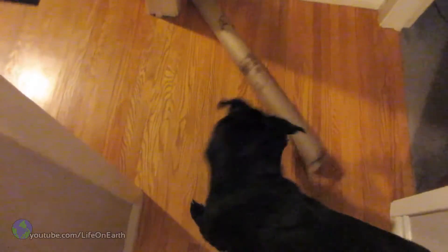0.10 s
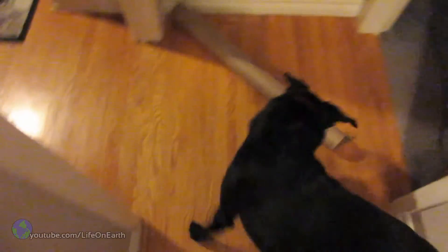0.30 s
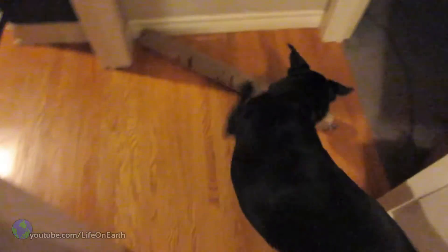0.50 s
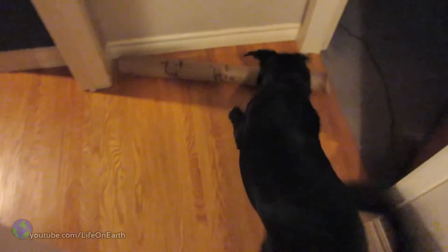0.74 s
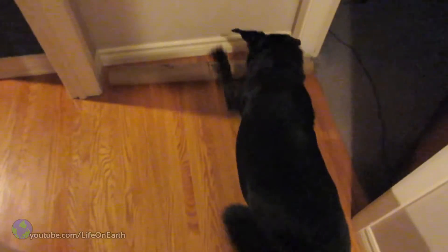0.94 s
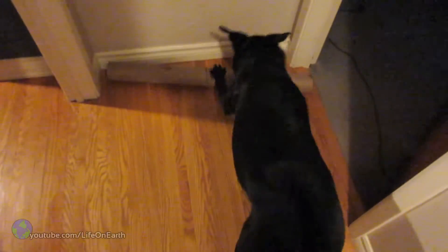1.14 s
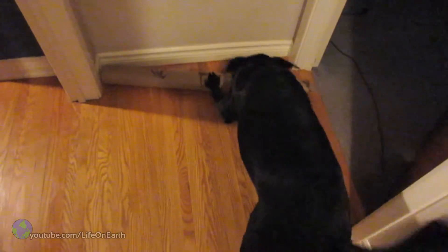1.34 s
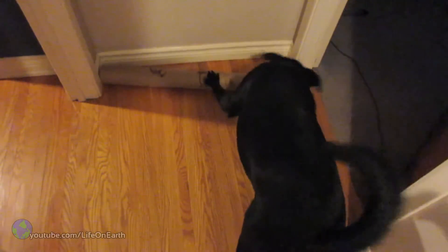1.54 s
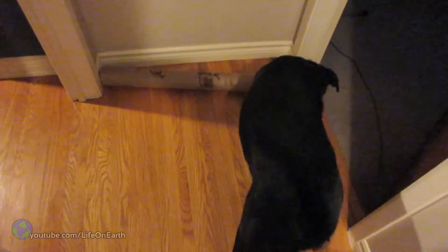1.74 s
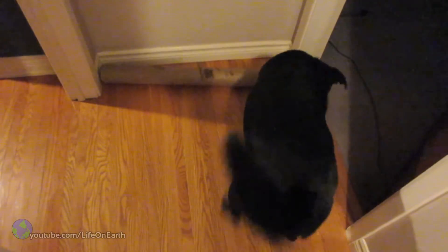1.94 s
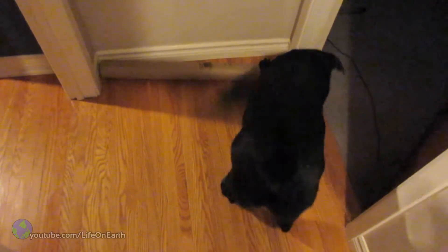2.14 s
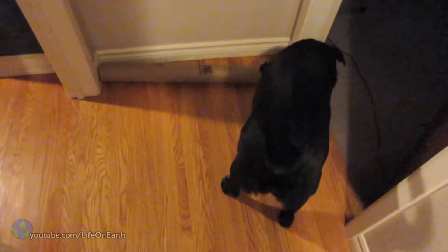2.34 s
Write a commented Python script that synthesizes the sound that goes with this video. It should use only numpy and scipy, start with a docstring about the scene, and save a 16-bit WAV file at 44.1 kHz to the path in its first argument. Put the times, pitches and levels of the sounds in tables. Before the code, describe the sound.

Hollow cardboard tube knocks come in uneven clusters, first a sharp clack, then a rapid clatter, a loud frame knock and later isolated cracks, over soft scuffing and low dragging; one nearby microphone, short indoor hallway echo.

```python
"""Hard contacts clack, a tube booms hollowly, a door frame knocks, collar tags tinkle, paws scuff.
A dog shoves a long cardboard tube over the hardwood floor of a small hallway into the frame; one microphone.
Clacks are enveloped bursts of noise in four bands; tube, boards, frame and tags are struck decaying modes.
Scuff, drag, rumble and room murmur are coloured noise, the squeak narrow noise; decaying noise is the hallway.
"""
import sys
import numpy as np
from scipy import signal
from scipy.fft import rfft, irfft
from scipy.io import wavfile

SR = 44100
rng = np.random.default_rng(int(sys.argv[2]) if len(sys.argv) > 2 else 0)


def store_wav(level_fs):
    """Save 16-bit WAV to argv[1]."""
    pcm = np.round(np.clip(np.atleast_2d(level_fs), -1, 1) * 32767)
    wavfile.write(sys.argv[1], SR, pcm.T.astype(np.int16))


N = 108045

# hallway decay: (frequency [Hz], t60 [s])
HALL_DECAY = [(100, 0.27), (500, 0.36), (2000, 0.27), (6000, 0.22), (14000, 0.1)]


def amp(db):
    """Amplitude ratio of a level in dB."""
    return 10 ** (np.asarray(db) / 20)


def rms_one(x):
    """Scale to rms 1."""
    return x / np.sqrt(np.mean(x ** 2) + 1e-20)


def at_hz(points, hz):
    """Interpolate (frequency, value) points over log frequency."""
    points = np.array(points)
    return np.interp(np.log(hz + 1), np.log(points[:, 0]), points[:, 1])


def in_time(rows):
    """Interpolate each column of (time, values...) rows to every sample."""
    s, *columns = np.transpose(rows)
    return [np.interp(np.arange(N) / SR, s, column) for column in columns]


def bandpass(x, low_hz, high_hz):
    """Butterworth band-pass."""
    return signal.sosfilt(signal.butter(2, [low_hz, high_hz], "band", fs=SR, output="sos"), x)


def coloured(spectrum):
    """Noise with the given spectrum, rms 1."""
    bins = rfft(rng.standard_normal(N))
    hz = np.arange(len(bins)) * SR / N
    return rms_one(irfft(bins * amp(at_hz(spectrum, hz)), N))


def strike(s, db, modes, contact_hz, db_per_octave=0, spread_db=3.5):
    """Each blow rings every mode, neighbours in opposite phase; a soft contact rounds the start."""
    out = 0
    luck_db = spread_db * rng.standard_normal((len(s), len(modes)))
    start = (s * SR).astype(int)
    for k, (hz, level_db, t60_s) in enumerate(modes):
        tilt_db = db_per_octave * np.log2(hz / modes[1][0])   # pivots on the second mode
        clicks = np.full(N, 1e-18)
        clicks[start] = (-1) ** k * amp(db + level_db + tilt_db + luck_db[:, k])
        r = amp(-60 / (t60_s * SR))   # pole radius
        w = 2 * np.pi * hz / SR
        out = out + signal.lfilter([0, np.sin(w)], [1, -2 * r * np.cos(w), r * r], clicks)
    return signal.sosfilt(signal.butter(2, contact_hz, fs=SR, output="sos"), out)


def scuffing():
    """Fur and pads scuff: low and high friction noise, each with its own level curve."""
    # (time [s], low-noise level [dB], high-noise level [dB])
    scuff_levels = [(0, -48.5, -47.5), (.1, -49.5, -55), (.15, -49, -51.5), (.19, -45.5, -56),
                    (.3, -43.5, -50), (.37, -43, -42.5), (.41, -48.5, -54), (.55, -48, -55),
                    (.78, -54.5, -55.5), (.85, -53.5, -53), (.92, -63, -63), (1.16, -56.5, -66),
                    (1.23, -55.5, -57), (1.34, -47, -51), (1.43, -46, -60.5), (1.55, -58, -68),
                    (1.63, -58, -61.5), (1.69, -42, -42), (1.73, -50.5, -63.5), (1.95, -65, -66),
                    (2.12, -61, -62), (2.26, -54, -55), (2.31, -40.5, -55.5), (2.37, -51, -52.5),
                    (2.43, -44, -57), (2.45, -43, -50)]
    # spectra: (frequency [Hz], relative density [dB])
    low_spectrum = [(300, -3.5), (600, 5), (1000, 0), (2000, -1), (3200, -7), (5000, -16), (9000, -27)]
    high_spectrum = [(1500, -37), (3000, 1), (4500, -3), (8000, -4), (12000, -13.5), (15400, -20)]
    low_db, high_db = in_time(scuff_levels)
    return amp(low_db) * coloured(low_spectrum) + amp(high_db) * coloured(high_spectrum)


def dragging():
    """The tube drags on the boards: low friction noise that swells and fades."""
    # (time [s], level [dB])
    drag_levels = [(0.0, -51), (0.27, -38.5), (0.45, -38), (0.52, -43.5), (0.63, -26), (0.76, -49),
                   (0.98, -39.5), (1.17, -64), (1.35, -51), (1.51, -45), (1.77, -74), (1.9, -44),
                   (2.21, -57.5), (2.37, -64.5), (2.45, -67)]
    # spectrum: (frequency [Hz], relative density [dB])
    drag_spectrum = [(30, -25), (50, -31), (80, 1), (105, 14.5), (150, 13), (200, 8), (300, 8),
                     (500, -11.5), (1200, -33)]
    return amp(in_time(drag_levels)[0]) * coloured(drag_spectrum)


def rumble():
    """Deep rumble of the house floor: noise mostly between 30 and 80 Hz."""
    # (time [s], level [dB])
    rumble_levels = [(0.0, -35), (0.03, -64), (0.63, -66), (0.89, -66), (0.97, -61), (1.58, -74),
                     (1.94, -46.5), (2.18, -49), (2.23, -54), (2.45, -66)]
    # spectrum: (frequency [Hz], relative density [dB])
    rumble_spectrum = [(15, -29), (30, -4), (45, 11.5), (60, 20), (90, -42)]
    return amp(in_time(rumble_levels)[0]) * coloured(rumble_spectrum)


def room_murmur():
    """Steady faint mid-range murmur of the room: noise strongest around 650-1100 Hz."""
    # spectrum: (frequency [Hz], relative density [dB])
    murmur_spectrum = [(18, -52), (30, -36), (654, -13), (828, -3), (943, -25), (1080, -1), (1230, -30),
                       (2290, -37), (15400, -45)]
    return amp(-61) * coloured(murmur_spectrum)


def hard_contacts():
    """Claws on the boards and the tube's edge cracking on the frame: gritty bursts with echo and tail."""
    # (time [s], relative level [dB], rise [ms], fall [ms], then relative level of four bands, low to high [dB])
    contacts = [(0.0024, -33.5, 1.2, 7.3, -42, -9, -13, -24), (0.164, -44, 4.5, 5.8, 9, 2, 5, -8),
                (0.2058, -3, 0.73, 7.6, -14, -14, -12.5, -27),
                (0.359, -24.5, 1.1, 11.2, -11.5, -12, -21, -37),
                (0.4617, -34.5, 1.2, 5.5, -4.5, -15, -25, -25), (0.5662, -1, 0.65, 3.44, -8, -5.5, -8, -32),
                (0.6071, -7.5, 1.2, 3.3, -6, -6, -8.5, -23), (0.6113, -5, 0.69, 3.5, -9.5, -19, -18, -32),
                (0.6594, -8, 2.35, 6.5, -14.5, -9, -10, -30),
                (0.846, -14, 4.9, 7.5, -21.5, -14.5, -17, -42),
                (0.9359, -2.5, 1.19, 1.92, -3.5, -6, -21, -26),
                (1.0582, -22.5, 1.3, 7.8, -12, -11, -15, -20), (1.095, -32.5, 1.1, 4, -6, -23, -17, -26),
                (1.2898, -25, 1.3, 9.9, -8, -34, -45, -40), (1.724, -31.5, 0.68, 9, -7.5, -17, -26, -33),
                (1.788, -2.5, 0.31, 4.55, -13.5, -7, -13.5, -49),
                (1.8264, -14, 1.6, 5, -7.5, -38, -40, -40), (1.982, -29.5, 0.4, 12, -20, -15.5, -17, -37),
                (2.0143, -29.5, 1.8, 9.6, -12, -10.5, -16.5, -41),
                (2.142, -5, 0.9, 7.8, -19.5, -17, -12, -22.5), (2.287, -32, 0.73, 5.9, -7.5, -13, -32, -34),
                (2.3052, -36, 2.1, 7.7, -8, -4.5, -35, -40), (2.4156, -34, 1.2, 7.5, -11.5, -16, -13, -20)]
    # edges of the four bands [Hz]
    edges_hz = [1200, 2800, 5500, 10000, 15500]
    # broad board resonances: (frequency [Hz], width [Hz], added level [dB])
    board_resonances = [(2410, 700, -15), (3426, 320, -8), (5440, 133, -32.5), (6670, 700, -7)]
    contact_db, grain_db, grain_samples = -2.5, 3.5, 20
    wall_echo_db, wall_echo_ms, tail_db = -8, 5.6, -2

    lag = int(wall_echo_ms * SR / 1000)
    ms = np.arange(SR // 10) * 1000 / SR
    grain = np.repeat(rng.standard_normal(N // grain_samples + 1), grain_samples)[:N]
    grit = rng.standard_normal((4, N)) * amp(grain_db * grain)
    out = 0
    for k, (low, high) in enumerate(zip(edges_hz, edges_hz[1:])):
        shape = np.full(N + len(ms), 1e-9)
        for s, db, rise_ms, fall_ms, *bands_db in contacts:
            burst = (1 - np.exp(-ms / rise_ms)) * np.exp(-ms / fall_ms)
            shape[int(s * SR):][:len(ms)] += amp(db + bands_db[k] + contact_db) * burst
        # the nearest wall throws each clack back
        shape[lag:] += amp(wall_echo_db) * shape[:-lag]
        shape = shape[:N]

        # diffuse hallway tail, dying at the rate of each half band
        tail = 0
        middle = np.sqrt(low * high)
        for part_low, part_high in ((low, middle), (middle, high)):
            t60_s = at_hz(HALL_DECAY, np.sqrt(part_low * part_high))
            keep = amp(-120 / (t60_s * SR))   # energy kept per sample
            stored = np.sqrt(signal.lfilter([1 - keep], [1, -keep], shape ** 2))
            tail = tail + bandpass(stored * rng.standard_normal(N), part_low, part_high)

        direct = bandpass(shape * grit[k], low, high)
        bandwidth_gain = np.sqrt(SR / 2 / (high - low))
        out = out + (direct + amp(tail_db) * tail) * bandwidth_gain
    resonant = 0
    for hz, width_hz, db in board_resonances:
        resonant = resonant + amp(db) * signal.lfilter(*signal.iirpeak(hz, hz / width_hz, SR), out)
    return out + resonant


def collar_tags():
    """Collar tags touch: a hard contact rings short high modes."""
    # (time [s], relative level [dB], tilt [dB/octave])
    tinkles = [(0.0034, -44, -1), (0.0502, -29, -6), (0.09, -38, 0), (0.263, -24, -8), (0.34, -38, 7),
               (0.807, -55, 0), (0.83, -25, 4), (0.85, -43, -4), (0.913, -45, 0), (1.215, -46, -2),
               (2.419, -38, -4), (2.436, -32, 0)]
    # (frequency [Hz], relative level [dB], t60 [s])
    tag_modes = [(5800, -19, 0.057), (8160, -10, 0.046), (8600, -17, 0.022), (10700, -13, .06),
                 (10466, -20, 0.041), (10940, -22, 0.064), (13500, -12.5, 0.041), (14330, -19, 0.029)]
    s, db, tilt = np.transpose(tinkles)
    return strike(s, db, tag_modes, contact_hz=19000, db_per_octave=tilt, spread_db=1.5)


def tube():
    """Bumps ring the tube's three groups of resonances and the floor boards beneath."""
    # (time [s], then relative level of first, second, higher resonances and boards [dB])
    bumps = [(0.028, -38.5, -45, -57.5, -28.5), (0.12, -58, -66, -65, -37), (0.2, -33.5, -47, -57, -32),
             (0.29, -27, -30, -46, -25), (0.343, -22, -28.5, -33.5, -25), (0.375, -32, -29.5, -62, -46),
             (0.418, -44, -42, -48, -36), (0.476, -31.5, -57, -45, -29), (0.519, -42, -59, -65, -38),
             (0.581, -11.5, -24.5, -21, -35), (0.618, -16, -19.5, -23, -36), (0.681, -65, -29, -41, -29),
             (0.734, -48, -69, -45, -38.5), (0.832, -26, -38.5, -73, -53), (0.937, -34, -22.5, -23.5, -53),
             (0.949, -22, -24.5, -28, -39), (0.984, -19.5, -20.5, -30.5, -35),
             (1.059, -21, -23, -32.5, -34), (1.102, -32.5, -64, -35.5, -34.5), (1.292, -66, -56, -45, -57),
             (1.329, -21, -37, -37, -40), (1.365, -52, -34.5, -49, -58), (1.423, -27.5, -29.5, -29, -52),
             (1.468, -48, -31, -42, -67), (1.727, -26, -45, -27.5, -50), (1.742, -23.5, -34, -38, -51),
             (1.7994, -17, -12.5, -23.5, -47), (1.822, -22.5, -8.5, -31, -55), (1.85, -19, -20, -22, -58),
             (1.878, -42, -20.5, -62, -56), (1.925, -32, -26, -37, -57),
             (2.145, -22.5, -34.5, -32.5, -30.5), (2.341, -31, -33.5, -50, -47),
             (2.408, -39, -40, -59, -67)]
    # modes: (frequency [Hz], relative level [dB], t60 [s])
    first_modes = [(125, -5, 0.088), (154.4, 1.5, 0.23), (180, -9, 0.12)]
    second_modes = [(243, 0, 0.059), (286, 2, 0.048), (296.2, 1, 0.16), (340.4, -9, 0.16)]
    higher_modes = [(370, -1.8, 0.035), (421.3, 0.5, 0.12), (461, 5.8, 0.029), (541.4, 0, 0.055),
                    (683, -3.5, 0.1)]
    board_modes = [(71.3, -3, 0.17), (88.1, 5, 0.21)]
    s, first_db, second_db, higher_db, boards_db = np.transpose(bumps)
    boom = strike(s, first_db, first_modes, contact_hz=420)
    boom = boom + strike(s, second_db, second_modes, contact_hz=610)
    boom = boom + strike(s, higher_db, higher_modes, contact_hz=1350)
    thud = strike(s, boards_db, board_modes, contact_hz=197)
    return boom + thud


def door_frame():
    """The tube end knocks the door frame, which rings in short modes."""
    # (time [s], relative level [dB], tilt [dB/octave])
    knocks = [(0.209, -29, 4), (0.302, -55, -10), (0.336, -32, -12), (0.567, -16.5, -5), (0.619, -13, 7.5),
              (0.661, -53, -12), (0.9374, -2.5, -5.5), (0.948, -44, -22), (0.973, -41, 8),
              (1.032, -20.5, 4.5), (1.059, -19, 0), (1.291, -31.5, 4), (1.365, -28, -2),
              (1.4335, -29.5, -7), (1.727, -21, 5.5), (1.751, -24.5, 4), (1.79, -25, -13),
              (1.801, -12.5, 10), (2.144, -37, -10), (2.289, -36, -12), (2.407, -38.5, -2)]
    # in order of alternating phase: (frequency [Hz], relative level [dB], t60 [s])
    frame_modes = [(825, -1, 0.017), (976, -4.5, 0.044), (756, -12, 0.092), (866, -6.5, 0.039),
                   (1172, -14, 0.029), (990, -30, 0.013), (1462, -13.5, 0.045), (1983, -24, 0.069)]
    s, db, tilt = np.transpose(knocks)
    return strike(s, db, frame_modes, contact_hz=4030, db_per_octave=tilt, spread_db=3.0)


def squeak():
    """Thin brief whistle: noise through a narrow resonance twice, under a bell-shaped envelope."""
    centre_s, length_s, hz, width_hz, level_db = 1.395, 0.02, 2385, 60, -48
    t = np.arange(N) / SR
    band = signal.iirpeak(hz, hz / width_hz, SR)
    whistle = signal.lfilter(*band, signal.lfilter(*band, rng.standard_normal(N)))
    return rms_one(whistle) * amp(level_db) * np.exp(-((t - centre_s) / length_s) ** 2)


def hall(x):
    """Diffuse tail: octave bands of noise, each dying at its own rate."""
    onset_s = 0.0079
    t = np.arange(SR // 2) / SR
    tail = 0
    for low in 60 * 2. ** np.arange(8):
        t60_s = at_hz(HALL_DECAY, low * np.sqrt(2))
        tail = tail + bandpass(rng.standard_normal(len(t)), low, 2 * low) * amp(-60 * t / t60_s)
    tail = tail * (1 - np.exp(-t / onset_s))
    return signal.fftconvolve(x, tail / np.sqrt(np.sum(tail ** 2)))[:N]


def scene():
    """Sum all sources and the hallway tail, the same in both channels."""
    noises = scuffing() + dragging() + rumble() + room_murmur() + squeak()
    clacks, tags, boom, frame = hard_contacts(), collar_tags(), tube(), door_frame()
    # the clacks already have their tail
    echo = hall(amp(-11) * frame + amp(-6) * tags + amp(-12) * boom)
    mono = noises + clacks + tags + boom + frame + echo
    return np.array([mono, mono])


def record(dry):
    """Deep bass rolls off, the highest peaks clip, the top is cut."""
    low_cut_hz, high_cut_hz, clip_level = 40, 15750, 0.93
    thin = signal.sosfilt(signal.butter(2, low_cut_hz, "high", fs=SR, output="sos"), dry)
    clipped = np.clip(thin, -clip_level, clip_level)
    return signal.sosfilt(signal.cheby2(14, 60, high_cut_hz, fs=SR, output="sos"), clipped)


dry = scene()
out = record(dry)
store_wav(out)
```